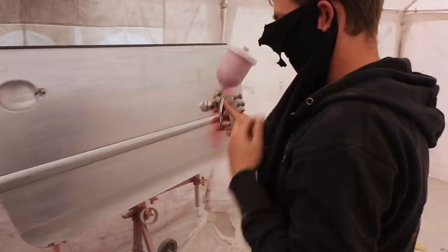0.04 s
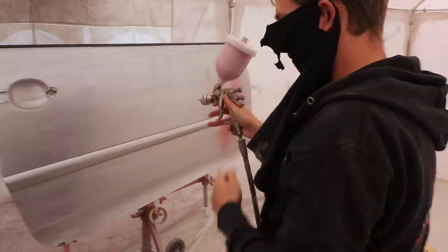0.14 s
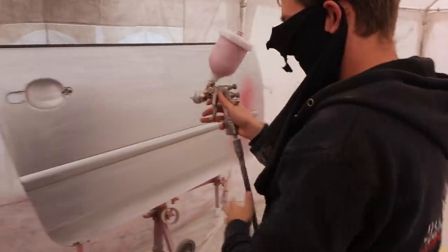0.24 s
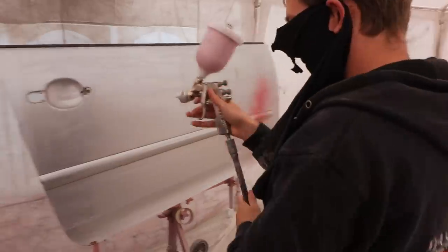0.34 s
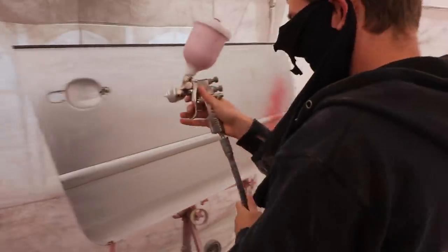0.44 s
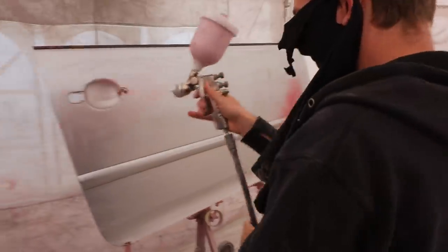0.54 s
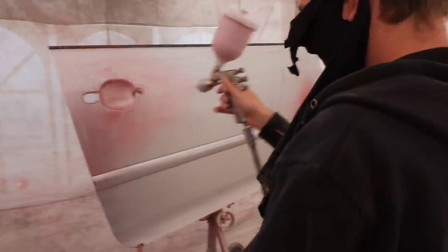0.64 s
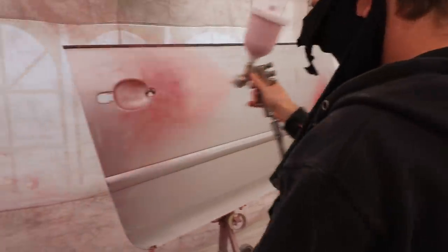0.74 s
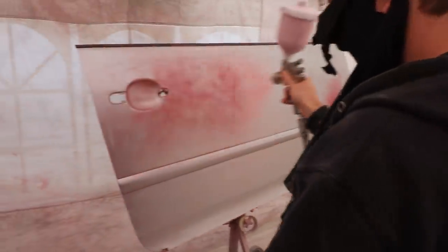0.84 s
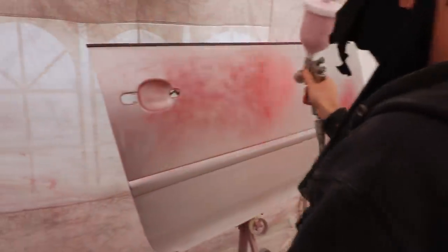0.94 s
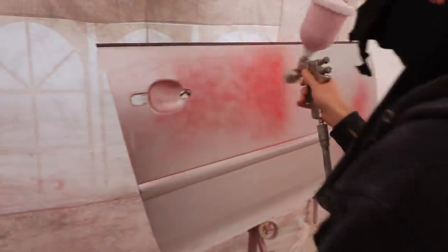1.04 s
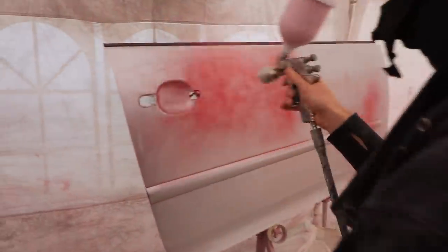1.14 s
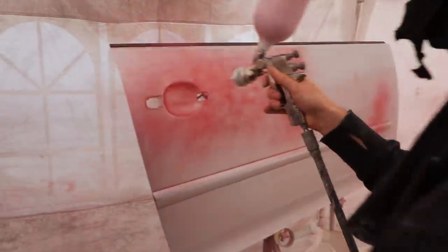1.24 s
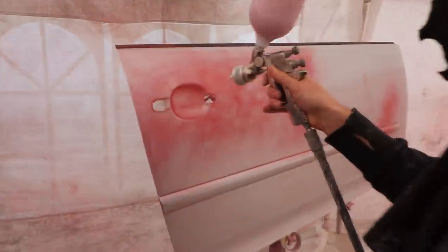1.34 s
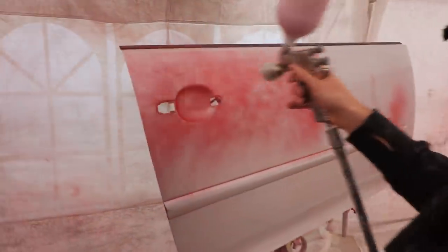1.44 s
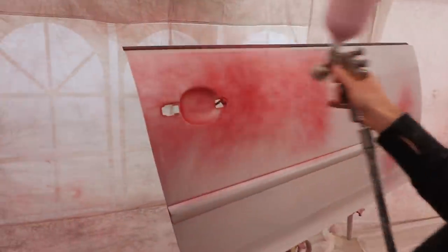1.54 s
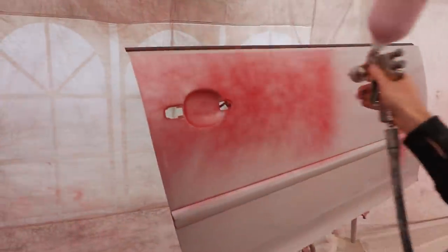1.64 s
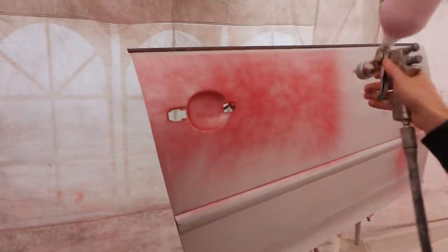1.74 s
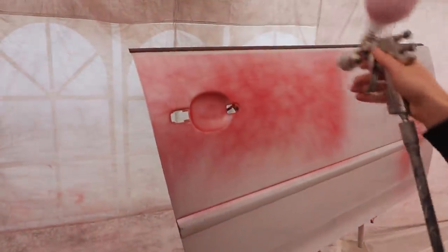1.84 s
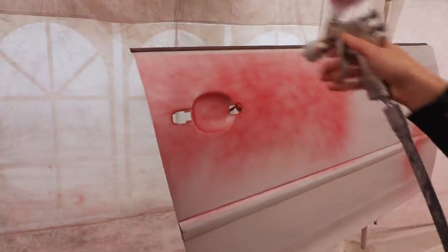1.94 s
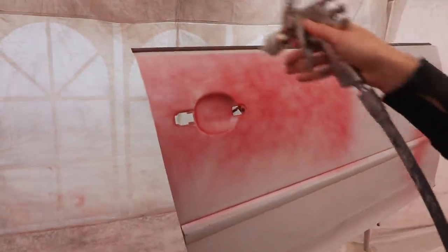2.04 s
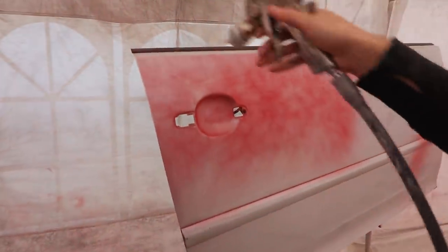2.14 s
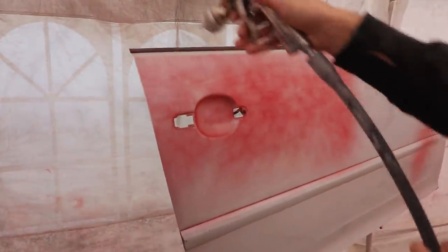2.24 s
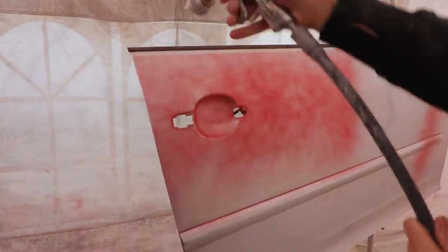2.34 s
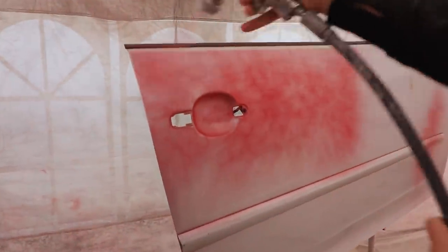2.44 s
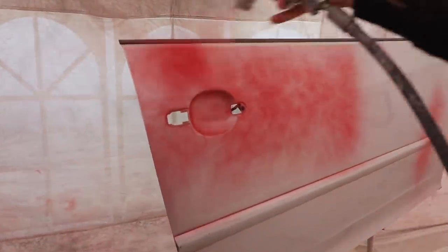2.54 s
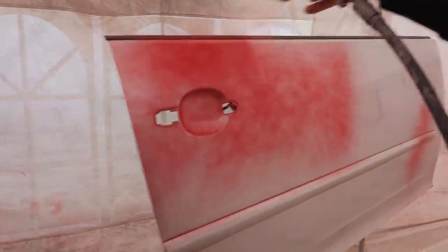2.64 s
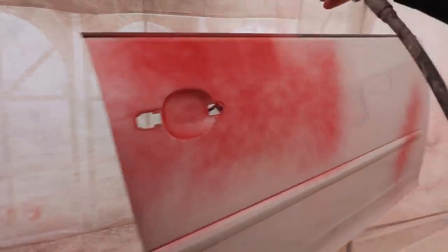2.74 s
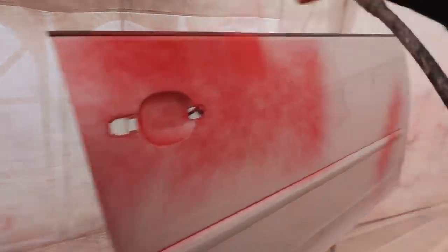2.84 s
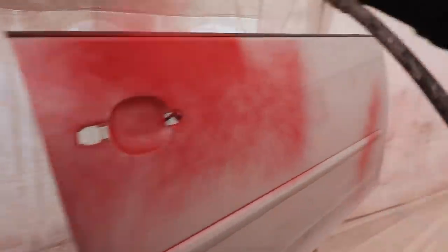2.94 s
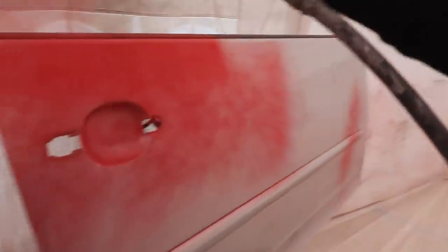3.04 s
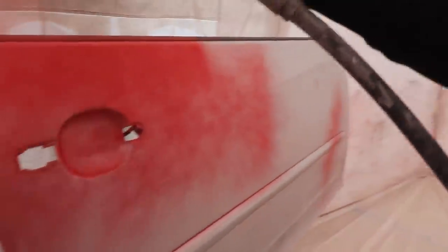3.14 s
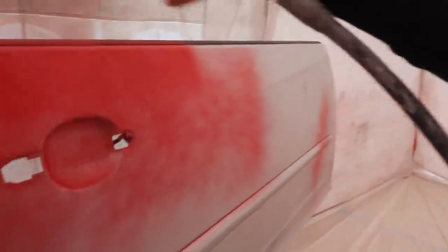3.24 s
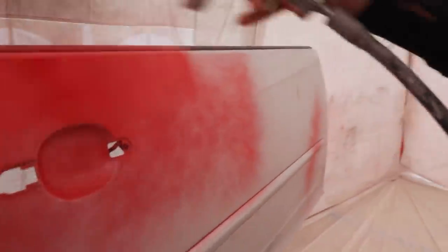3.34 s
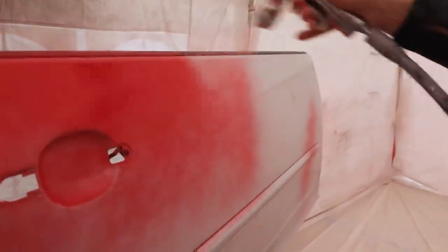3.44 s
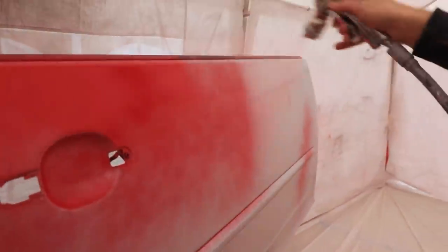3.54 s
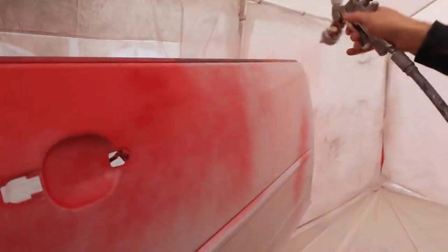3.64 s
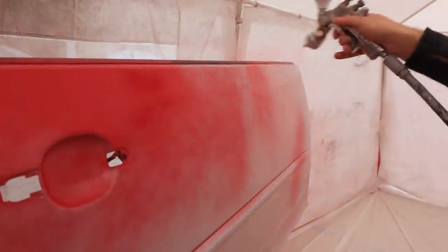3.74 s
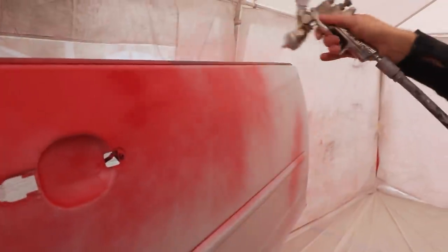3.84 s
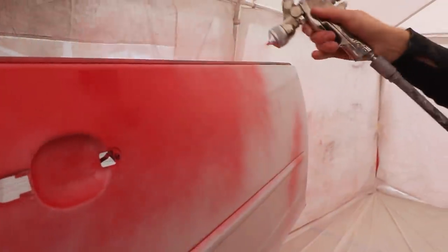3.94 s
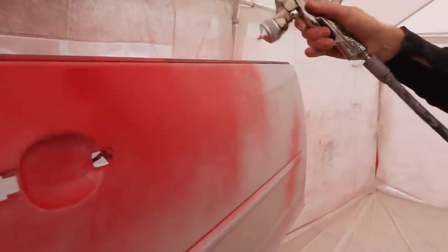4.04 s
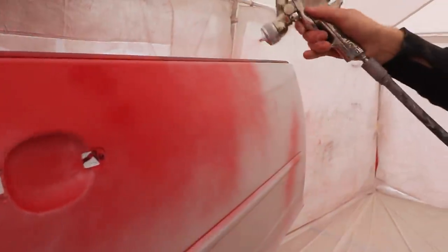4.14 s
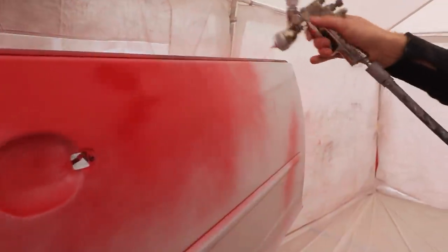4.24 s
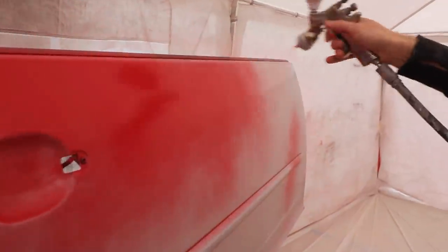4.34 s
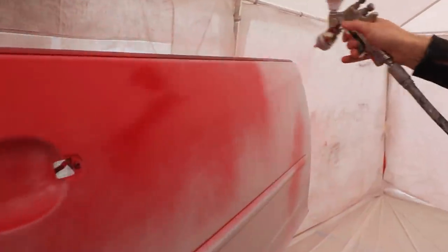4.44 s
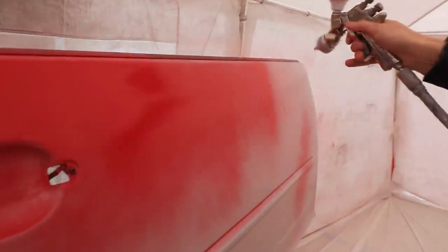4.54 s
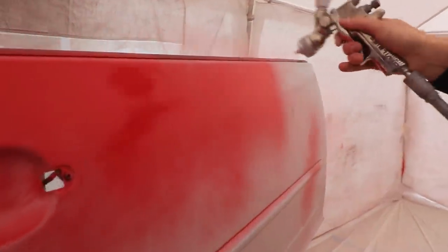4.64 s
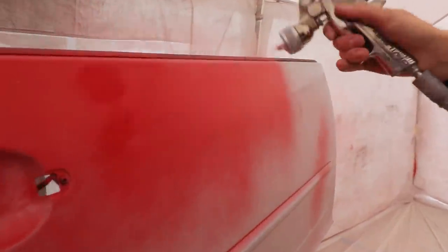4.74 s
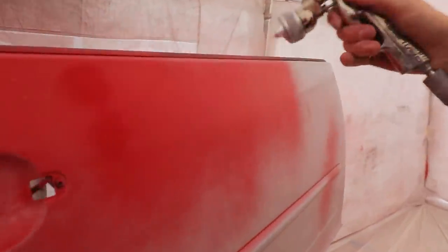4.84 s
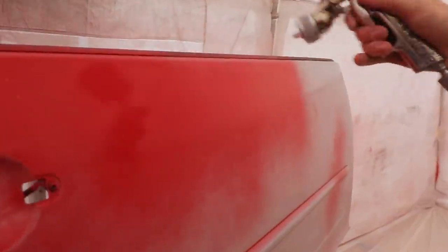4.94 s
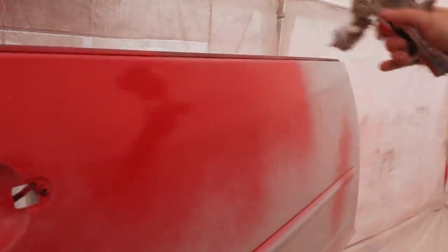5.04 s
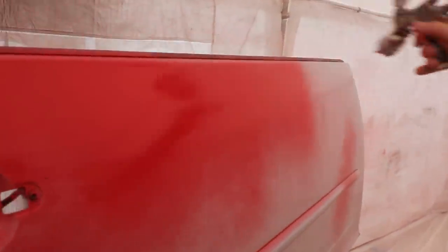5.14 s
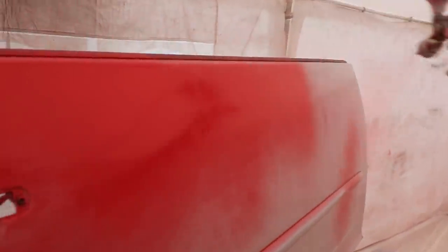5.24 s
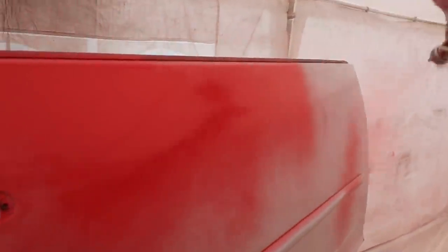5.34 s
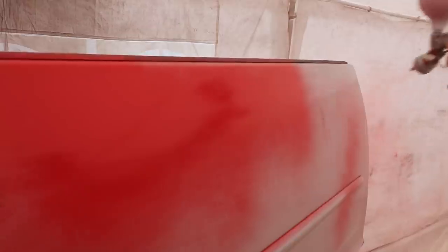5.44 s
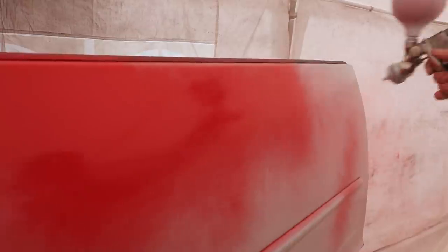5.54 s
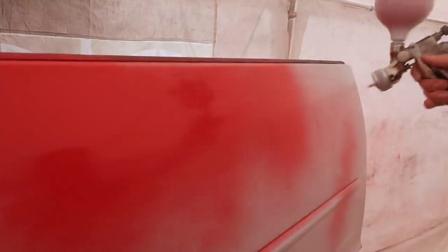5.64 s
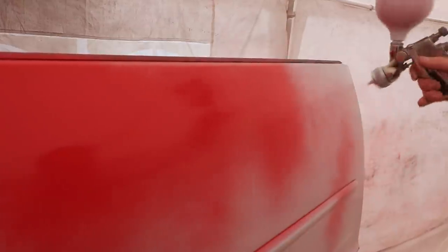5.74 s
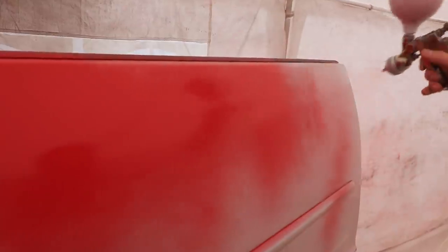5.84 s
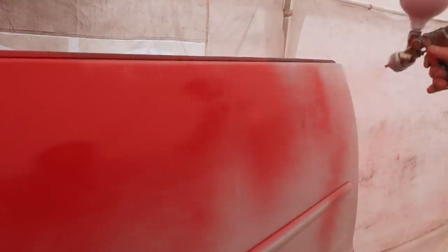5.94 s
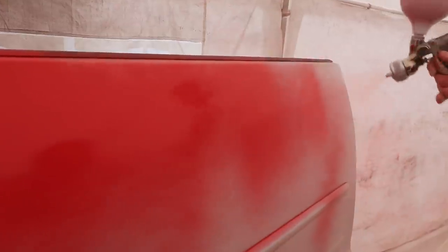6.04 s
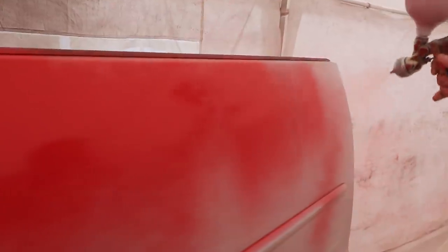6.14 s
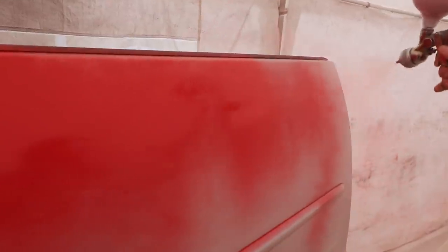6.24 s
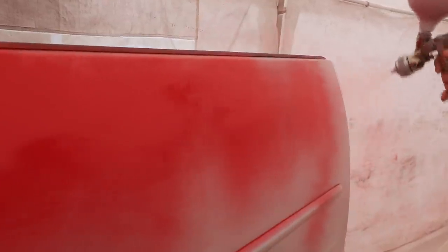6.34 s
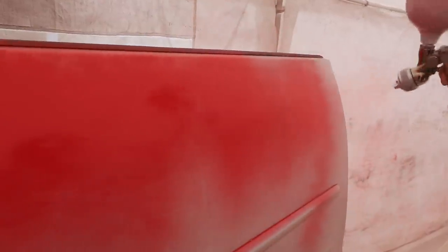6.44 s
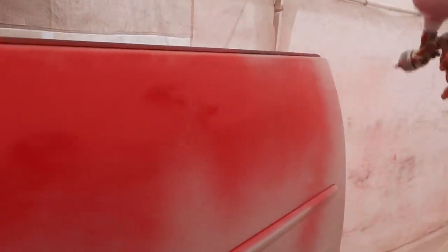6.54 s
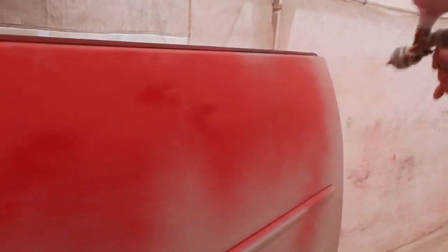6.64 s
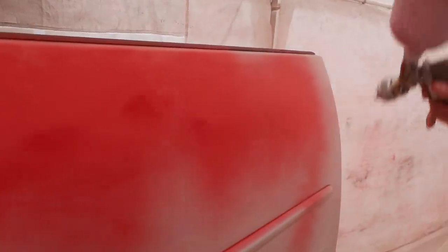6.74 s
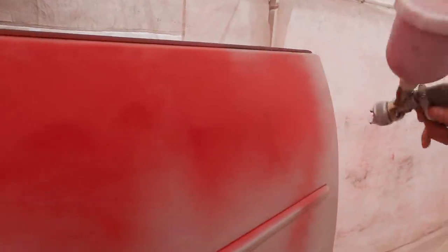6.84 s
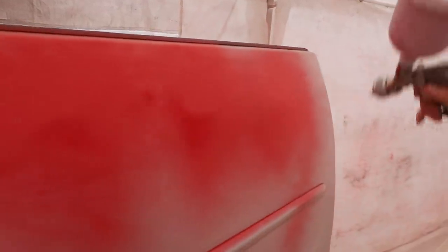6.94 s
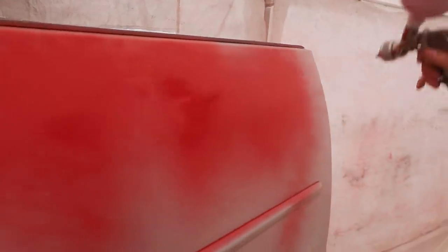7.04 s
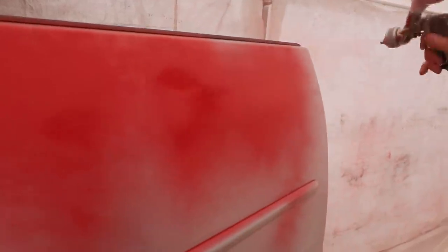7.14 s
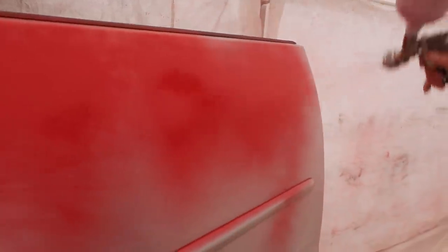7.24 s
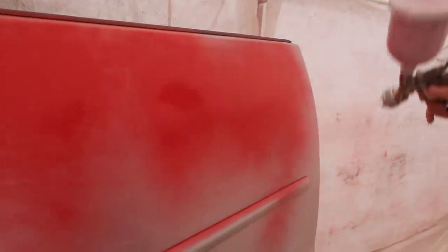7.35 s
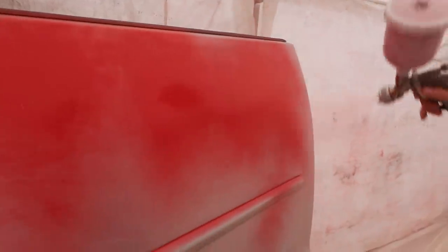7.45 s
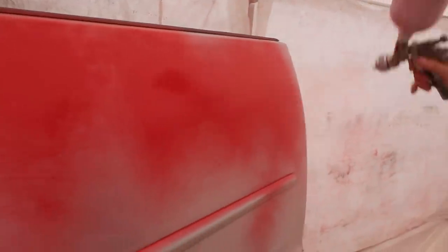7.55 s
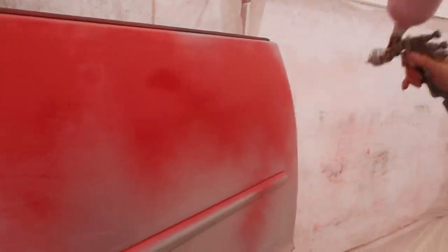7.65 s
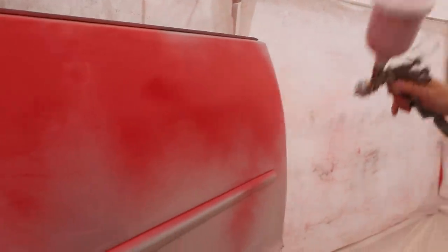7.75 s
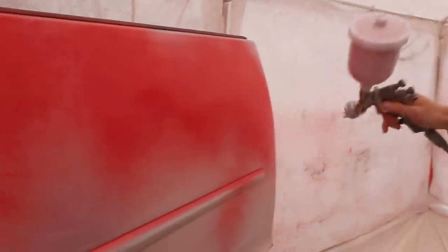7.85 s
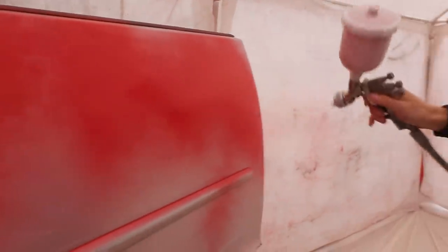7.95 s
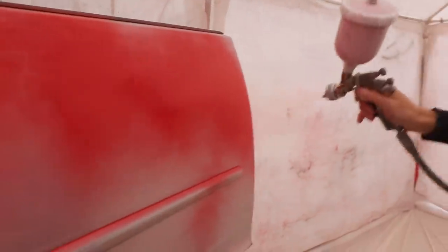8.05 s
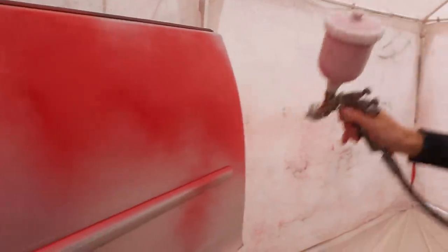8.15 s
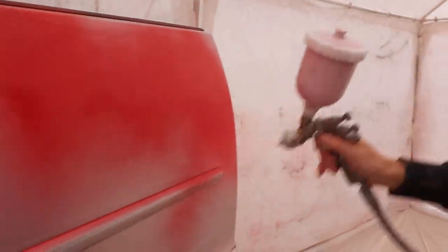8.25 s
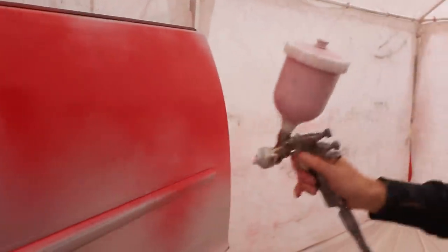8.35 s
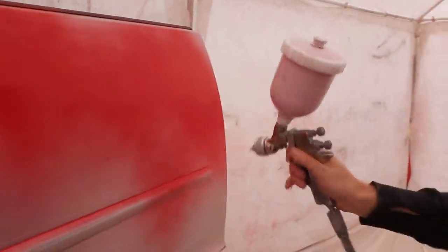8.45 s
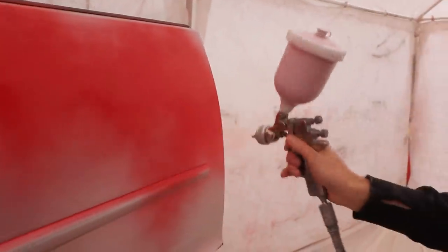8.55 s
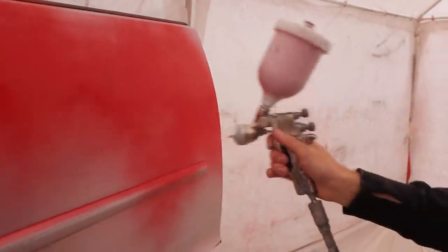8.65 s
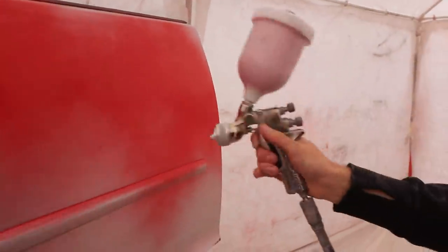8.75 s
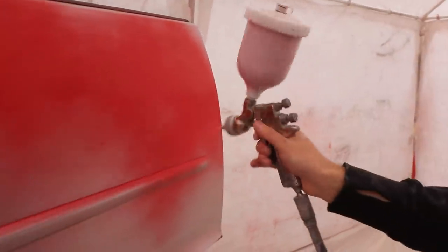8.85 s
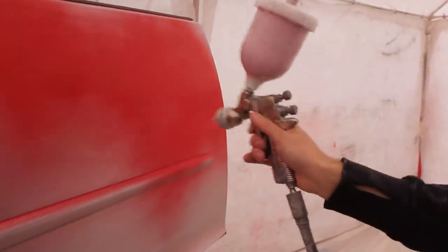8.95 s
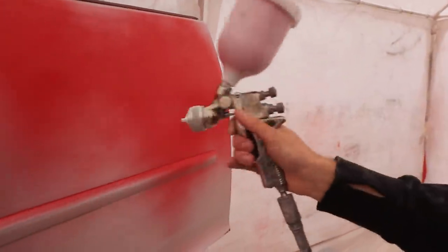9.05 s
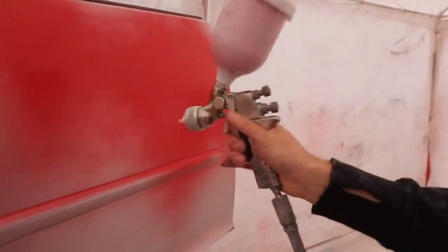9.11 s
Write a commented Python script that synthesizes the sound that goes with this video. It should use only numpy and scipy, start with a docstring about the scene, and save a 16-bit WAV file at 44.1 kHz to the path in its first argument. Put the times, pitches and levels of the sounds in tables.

```python
"""Inside a plastic tent, close to the camera, a compressed-air spray gun paints a car door.
A faint puff, a short pass, then a long one; each pass opens with a surge of stored pressure.
Shaped noise makes the air: strokes of the hand swell the nozzle's hiss and change the splash and
roar on the panel, which thin out past the door's edge. Sliding narrow noise hoots, damped tones bump,
bursts tick, and gusts buffet the microphone over a quiet tent with a faint rumble."""
import sys
import numpy as np
from scipy import signal
from scipy.io import wavfile
from scipy.ndimage import uniform_filter1d

SR = 44100
rng = np.random.default_rng(int(sys.argv[2]) if len(sys.argv) > 2 else 0)


def dump_mix(stems):
    """Bounce the given channels to the path in sys.argv[1] as a 16-bit WAV at rate SR."""
    frames = np.atleast_2d(stems).T  # one column per channel
    limited = np.clip(frames, -1, 1)  # hard clip at full scale
    pcm = np.round(limited * 32767).astype(np.int16)
    wavfile.write(sys.argv[1], SR, pcm)


N = 404838
FRAME, HOP = 512, 128  # samples
HZ = np.fft.rfftfreq(FRAME, 1 / SR)
FRAME_S = np.arange(N // HOP + 5) * HOP / SR
T = np.arange(N) / SR

# pulls of the trigger, with the surge of stored pressure: open_s, shut_s, surge_db
TRIGGER_PULLS = [(0.597, 2.03, 23.5), (2.416, 9.3, 18)]
# colour of the air leaving the nozzle: frequency_hz, density_db (per Hz, relative)
HISS_COLOUR = [(150, -36), (400, -32), (1000, -11), (2000, -11), (3000, -8), (3800, -7), (4800, -4),
               (6200, -5), (8000, -1.5), (10000, -1.16), (11500, -1), (13300, 0), (15000, 0.3),
               (16000, -6.5)]
# colour of the eddies and gusts at the microphone: frequency_hz, density_db (per Hz, relative)
EDDY_COLOUR = [(20, -8), (60, -16), (120, 12.5), (200, -1), (350, 5), (500, 4.5), (900, -3), (3000, -50)]


def from_db(db):
    """Decibels to gain."""
    return 10 ** (np.asarray(db) / 20)


def unit(x):
    """Scales to an rms of one."""
    return x / np.sqrt(np.mean(x ** 2) + 1e-20)


def spectrum(points):
    """Reads (Hz, dB) points on a log-frequency axis."""
    hz, db = np.transpose(points)
    return np.interp(np.log(HZ + 1), np.log(hz), db)


def controls(table):
    """Each column after the time as a curve over the frames."""
    s, *columns = np.transpose(table)
    return [np.interp(FRAME_S, s, column)[:, None] for column in columns]


def drift(seconds, band_hz):
    """A smooth random field over time and frequency, averaged twice over the given size."""
    field = rng.standard_normal((len(FRAME_S), len(HZ)))
    for axis, steps in enumerate((seconds * SR / HOP, band_hz / HZ[1])):
        for _ in range(2):
            field = uniform_filter1d(field, max(1, round(steps)), axis, mode="wrap")
    return unit(field)


def waver(seconds):
    """A smooth random curve over the frames."""
    return drift(seconds, 100)[:, :1]


def hump(hz, octaves, order=2):
    """A broad resonance in dB, centred on hz."""
    return -10 * order * np.log10(1 + (np.log2((HZ + 1) / hz) / octaves) ** 2)


def swell(middle_s, length_s, shape=2):
    """A smooth rise and fall from 0 to 1 and back; shape 2 is a bell, higher is flatter on top."""
    return np.exp(-abs(2 * (FRAME_S[:, None] - middle_s) / length_s) ** shape)


def turbulence(shape_db, level_db):
    """Churning air: noise whose colour and rms level change from frame to frame."""
    gain = from_db(shape_db) * np.ones((len(FRAME_S), 1))
    gain *= from_db(level_db) / np.sqrt(np.mean(gain ** 2, axis=1, keepdims=True))
    noise = rng.standard_normal(len(FRAME_S) * HOP)
    white = signal.stft(noise, nperseg=FRAME, noverlap=FRAME - HOP)[2]
    shaped = white[:, :len(FRAME_S)] * gain.T
    return signal.istft(shaped, nperseg=FRAME, noverlap=FRAME - HOP)[1][:N]


def add(mix, s, sound):
    """Mixes a sound in at time s."""
    part = mix[round(s * SR):][:len(sound)]
    part += sound[:len(part)]


def valve(rise_s=0.017, t60_s=0.18):
    """The air starts quickly with the trigger and dies away when it is let go."""
    opening = np.zeros(N)
    for open_s, shut_s, _ in TRIGGER_PULLS:
        rise = np.clip((T - open_s) / rise_s, 0, 1)
        opening += rise * from_db(-60 * np.maximum(T - shut_s, 0) / t60_s)
    return opening


def surge(crest_s=0.042, settle_s=0.22, shape=1.6):
    """The lift in dB while the pressure stored in the hose runs out."""
    t = FRAME_S[:, None]
    return sum(db * (t > open_s - 0.02) * swell(open_s + crest_s, 2 * settle_s, shape)
               for open_s, _, db in TRIGGER_PULLS)


def spray_swells(shape=2.6, splash_lead_s=0.0067):
    """All swells share one arch: lifts in dB of hiss, splash and roar, and the splash's resonance."""
    # swells of the spray, whose overlapping lifts add up: the first blast's low push, then strokes
    # of the hand: middle_s, length_s, hiss_lift_db, splash_lift_db, roar_lift_db, splash_hz
    swell_rows = [(0.625, 0.18, 0.5, 4, 12.5, 1800), (0.804, 0.41, 3, 17.5, 8.5, 1500),
                  (1.417, 0.69, 9.5, 10.3, -1.5, 1690), (2.022, 0.47, 11, -10, -7, 1600),
                  (2.665, 0.35, 4.5, 12, 8, 1650), (3.138, 0.35, 6.5, 4.5, 7, 1750),
                  (3.407, 0.44, 5, 4.5, 2, 1930), (4.148, 0.51, 8, 8.5, 3.5, 2060),
                  (4.976, 0.52, 7.5, 6, 5, 1900), (5.787, .36, 4.3, 7, 8.5, 1700),
                  (6.238, 0.2, 5.5, 5.5, 3.3, 1416), (6.602, 0.22, 4.5, 6, 5.5, 1400),
                  (6.905, 0.22, 5, 0, 3.5, 1950), (7.126, 0.21, 5.6, 1, 0.5, 1400),
                  (7.545, 0.49, 1.5, 3, 4, 1400), (8.067, 0.24, 1.2, 3.7, 2.5, 1400),
                  (8.5, 0.34, 2, 5, 4.5, 1640), (8.892, 0.2, 3, 3, 1, 1550)]
    middle_s, length_s, hiss_db, splash_db, roar_db, hz = np.transpose(swell_rows)
    jet = swell(middle_s, length_s, shape)
    panel = swell(middle_s - splash_lead_s, length_s, shape)  # the fan meets the panel before the hiss peaks
    weights = panel + 1e-3
    splash_hz = weights @ hz / weights.sum(1)
    return [curve[:, None] for curve in (jet @ hiss_db, panel @ splash_db, panel @ roar_db, splash_hz)]


def off_edge(crossing_s=0.14):
    """The share of the fan that misses the door."""
    # the fan runs past the edge of the door: from_s, to_s
    edge_spans = [(1.75, 1.99), (5.19, 5.6)]
    t = FRAME_S[:, None]
    return sum(np.clip(np.minimum(t - from_s, to_s - t) / crossing_s + 0.5, 0, 1)
               for from_s, to_s in edge_spans)


def door_echo(delay_s=0.0012, sway=0.14, strength=0.027):
    """The door mirrors the nozzle: a comb in dB that slides as the hand sways."""
    delay = delay_s * np.exp(sway * waver(0.488))
    return 20 * np.log10(abs(1 + strength * np.exp(-2j * np.pi * HZ * delay)))


def nozzle(hiss_db, splash_db, press=0.115, thinning=0.079, miss_db=2.0, beam_octaves=0.18,
           patchy_db=1.9, waver_db=0.77):
    """The bright hiss of the jet, fuller when the air is pressed against the door."""
    # level of the hiss between swells, rising as the gun comes closer: time_s, level_db
    nearness = [(0.6, -44), (3.7, -42.5), (6.0, -40.5), (9.1, -35)]
    # the sharpest band of the hiss, which shifts as the gun turns: time_s, centre_hz, lift_db
    beam = [(1.0, 8500, 1.5), (1.9, 14500, 1.5), (2.55, 8400, 4), (2.75, 9000, -2), (2.92, 13100, 2),
            (3.1, 11500, 0.5), (4.2, 10100, 2), (5.0, 10800, 1), (5.3, 6400, 1.5), (5.6, 11000, -0.5),
            (5.9, 13300, 2.5), (6.35, 9500, 1.5), (6.6, 8800, 2.5), (6.9, 8800, 0.5), (7.0, 12000, -7),
            (7.12, 15100, 8), (7.35, 11000, -0.5), (7.55, 8600, 1), (7.9, 8400, 4.5), (8.2, 7500, 5.5),
            (8.5, 7400, -1), (8.7, 11900, 5), (9.15, 12000, 4)]
    near_db, = controls(nearness)
    beam_hz, beam_lift_db = controls(beam)
    force_db = hiss_db + surge()
    fullness_db = press * splash_db - thinning * force_db - miss_db * off_edge()
    shape_db = spectrum(HISS_COLOUR) + fullness_db / (1 + (HZ / 6600) ** 6)  # fullness below 6600 Hz
    shape_db += beam_lift_db * from_db(hump(beam_hz, beam_octaves))
    shape_db += door_echo() + patchy_db * drift(0.037, 200)
    return turbulence(shape_db, near_db + force_db + waver_db * waver(0.085))


def splash(lift_db, hz, level_db=-53.0, miss_db=16.0, octaves=0.8, patchy_db=3.5, flutter_db=1.43):
    """The fan of air breaks on the sheet metal in a hollow rush."""
    shape_db = hump(hz, octaves, order=3) + patchy_db * drift(0.076, 250)
    now_db = level_db + lift_db - miss_db * off_edge() + flutter_db * waver(0.015)
    return turbulence(shape_db, now_db)


def roar(lift_db, level_db=-52.0, miss_db=4.5, octaves=0.83, lowest_hz=290, patchy_db=3.5, flutter_db=1.5):
    """Larger whirls run along the panel and sound lower; the width of the fan limits their size."""
    # resonance of the air spreading along the panel: time_s, centre_hz
    panel_resonance = [(0.6, 810), (0.85, 610), (1.4, 850), (2.6, 650), (3.0, 970), (3.85, 900), (4.2, 650),
                       (4.5, 960), (5.05, 594), (5.47, 910), (5.7, 700), (6.05, 820), (6.4, 596),
                       (8.0, 656), (8.5, 490), (9.1, 670)]
    hz, = controls(panel_resonance)
    shape_db = hump(hz, octaves, order=3) - 10 * np.log10(1 + (lowest_hz / (HZ + 1)) ** 6)
    shape_db = shape_db + patchy_db * drift(0.038, 100)
    now_db = level_db + lift_db - miss_db * off_edge() + flutter_db * waver(0.02)
    return turbulence(shape_db, now_db)


def hoots(width=0.1, taper=0.57):
    """Air catches edges and hollows of the door: noise in a narrow resonance whose pitch slides."""
    # hoots as the gun passes: start_s, end_s, first_hz, last_hz, level_db
    hoot_slides = [(0.389, 0.467, 1150, 1360, -65), (0.585, 0.73, 950, 800, -43.5),
                   (0.691, 1.077, 1450, 1554, -41.5), (1.29, 1.56, 1780, 2050, -44.5),
                   (1.58, 1.776, 660, 738, -48.5), (3.001, 3.327, 1860, 2180, -43.5),
                   (3.141, 3.481, 2200, 2830, -47), (3.596, 3.775, 1885, 1790, -47.5),
                   (4.0, 4.42, 563, 521, -54), (4.55, 5.016, 1050, 632, -49), (4.997, 5.245, 529, 748, -58),
                   (5.307, 5.57, 685, 960, -52), (6.9, 7.276, 518, 847, -47.5),
                   (7.703, 7.945, 690, 606, -53), (8.33, 8.603, 520, 471, -52),
                   (8.88, 9.015, 1850, 1650, -54)]
    out = np.zeros(N)
    for start_s, end_s, first_hz, last_hz, level_db in hoot_slides:
        hz = np.geomspace(first_hz, last_hz, round((end_s - start_s) * SR))
        smooth = signal.butter(2, width * first_hz, fs=SR, output="sos")
        noise = rng.standard_normal(SR) + 1j * rng.standard_normal(SR)
        wobble = signal.sosfilt(smooth, noise)[:len(hz)]
        hoot = unit((wobble * np.exp(2j * np.pi * np.cumsum(hz) / SR)).real)
        add(out, start_s, from_db(level_db) * hoot * signal.windows.tukey(len(hz), taper))
    return out


def leaks(rush_lingers=3.1, rush_hz=900, rush_octaves=2.04):
    """Faint puffs through the barely open valve: a fine hiss dies quickly, a dull rush lingers."""
    # air seeping through the valve: start_s, rise_s, hiss_db, rush_db, hiss_t60_s
    valve_leaks = [(0.325, .045, -50, -61.5, 0.33), (0.40, 0.023, -64, -61.5, 0.16),
                   (0.54, 0.07, -54, -55, .15), (2.04, 0.023, -73.5, -61.5, 0.67),
                   (2.397, 0.016, -54, -62, .15)]
    hiss = turbulence(0.5 * spectrum(HISS_COLOUR), 0)  # half the contrast of the full jet
    rush = turbulence(hump(rush_hz, rush_octaves, order=3), 0)
    out = np.zeros(N)
    for start_s, rise_s, hiss_db, rush_db, t60_s in valve_leaks:
        opening = np.clip((T - start_s) / rise_s, 0, 1)
        fall_db = -60 * np.maximum(T - start_s - rise_s, 0) / t60_s
        out += opening ** 3 * hiss * from_db(hiss_db + fall_db)
        out += opening * rush * from_db(rush_db + fall_db / rush_lingers)
    return out


def bumps(rustle=0.26, rustle_hz=450, softness=0.28):
    """Handling makes dull damped tones with a little low-passed rustle."""
    # soft bumps, level set before the envelope: start_s, level_db, pitch_hz, decay_s
    soft_bumps = [(0.036, -55, 85, 0.044), (0.077, -51, 115, 0.048), (0.133, -40.5, 106, 0.03),
                  (0.143, -43, 253, 0.012), (0.218, -46.5, 88, 0.022), (0.23, -55, 330, 0.0091),
                  (2.257, -60.5, 84, 0.017), (7.464, -23.5, 173, 0.0017), (8.903, -36, 288, 0.005)]
    out, t = np.zeros(N), T[:SR // 4]
    dull = signal.butter(2, rustle_hz, fs=SR, output="sos")
    for start_s, level_db, hz, decay_s in soft_bumps:
        scuff = unit(signal.sosfilt(dull, rng.standard_normal(len(t))))
        onset = 1 - np.exp(-t / (softness * decay_s))  # longer bumps start more gently
        body = np.sin(2 * np.pi * hz * t) + rustle * scuff
        add(out, start_s, from_db(level_db) * onset * np.exp(-t / decay_s) * body)
    return out


def ticks(decay_s=0.0005):
    """The trigger's tiny metal ticks: bright bursts of noise."""
    # ticks of the trigger: start_s, peak_db
    trigger_ticks = [(2.330, -69), (2.395, -44)]
    out, t = np.zeros(N), T[:SR // 4]
    bright = signal.butter(1, [4000, 9000], "band", fs=SR, output="sos")
    for start_s, peak_db in trigger_ticks:
        tick = signal.sosfilt(bright, rng.standard_normal(len(t)) * np.exp(-t / decay_s))
        add(out, start_s, from_db(peak_db) * tick / abs(tick).max())
    return out


def eddies(level_db=-63.0, miss_db=5.0, lumpy_db=2.5, wander_db=2.0):
    """Stray eddies reach the microphone in lumps."""
    lumps_db = lumpy_db * waver(0.02) + wander_db * waver(0.11)
    return turbulence(spectrum(EDDY_COLOUR), level_db - miss_db * off_edge() + lumps_db)


def gusts(lumpy_db=3.0, lowest_hz=100):
    """The rebounding air hits the microphone squarely for a moment."""
    # gusts at the microphone, level set before the low cut: middle_s, length_s, level_db
    mic_gusts = [(0.796, 0.18, -46), (1.348, 0.16, -53.5), (1.645, 0.24, -50.5), (2.5, .14, -48.5),
                 (2.636, 0.1, -37), (2.755, 0.15, -44), (3.102, 0.11, -47.5), (3.456, 0.17, -49.5),
                 (5.703, .1, -50.5), (6.246, 0.13, -62), (7.584, .12, -56), (8.25, 0.34, -68)]
    strength = sum(from_db(db) * swell(middle_s, length_s) for middle_s, length_s, db in mic_gusts)
    air = turbulence(spectrum(EDDY_COLOUR), lumpy_db * waver(0.02))
    air *= np.interp(T, FRAME_S, strength[:, 0])
    return signal.sosfilt(signal.butter(2, lowest_hz, "high", fs=SR, output="sos"), air)


def tent(x, wet_db=-15.5, t60_s=0.064):
    """The close plastic walls and the door add a short patter of reflections."""
    t = T[:SR // 5]
    struck = rng.random(len(t)) < 2000 / SR  # about 2000 reflections per second
    taps = rng.standard_normal(len(t)) * struck * (t > 0.004) * from_db(-60 * t / t60_s)
    wet = signal.oaconvolve(x, taps / np.linalg.norm(taps))[:N]
    return (x + from_db(wet_db) * wet) / np.hypot(1, from_db(wet_db))


def thin_bass(x, deep_hz=235, depth_db=20.5, squareness=4.0, flicker_db=4.5, flicker_s=0.035):
    """Short gaps and a random flicker in the level below about 235 Hz during the spray."""
    # short gaps in the bass: middle_s, length_s
    bass_gaps = [(0.692, 0.07), (0.948, 0.092), (1.083, 0.033), (1.237, 0.15), (1.905, 0.12), (3.795, 0.18),
                 (4.243, 0.059), (5.45, .08), (6.544, 0.11), (7.034, 0.12), (8.45, 0.13), (8.716, 0.26),
                 (9.132, 0.17)]
    middle_s, length_s = np.transpose(bass_gaps)
    bass = signal.sosfiltfilt(signal.butter(3, deep_hz, fs=SR, output="sos"), x)
    dip_db = depth_db * swell(middle_s, length_s, squareness).sum(1)
    dip_db += flicker_db * np.maximum(waver(flicker_s)[:, 0], 0)
    return x - bass * (1 - from_db(-np.interp(T, FRAME_S, dip_db) * valve()))


def background(level_db=-66.5, rumble_db=-70.0, rumble_hz=55, rumble_octaves=1.4):
    """The quiet tent and a faint rumble, both steady noise."""
    # colour of the quiet tent: frequency_hz, density_db (per Hz, relative)
    tent_colour = [(20, 5.5), (80, 7.5), (200, -3), (500, -7), (1000, -5), (2000, -13.5), (4000, -18.5),
                   (8000, -19), (15000, -17)]
    quiet = turbulence(spectrum(tent_colour), level_db)
    return quiet + turbulence(hump(rumble_hz, rumble_octaves, order=3), rumble_db)


def scene():
    """Everything reaches both channels alike."""
    hiss_db, splash_db, roar_db, splash_hz = spray_swells()
    spray = valve() * (nozzle(hiss_db, splash_db) + splash(splash_db, splash_hz) + roar(roar_db))
    air = thin_bass(tent(spray) + valve() * eddies() + background())
    mono = air + gusts() + hoots() + leaks() + bumps() + ticks()
    return np.array([mono, mono])


def record(dry, low_cut_hz=42, edge_hz=15850):
    """The camera's low cut and band limit."""
    thinned = signal.sosfilt(signal.butter(2, low_cut_hz, "high", fs=SR, output="sos"), dry)
    band_limit = signal.firwin(1023, edge_hz, window=("kaiser", 8), fs=SR)
    return signal.oaconvolve(thinned, band_limit[None], "same", axes=1)


dry = scene()
out = record(dry)
dump_mix(out)
```